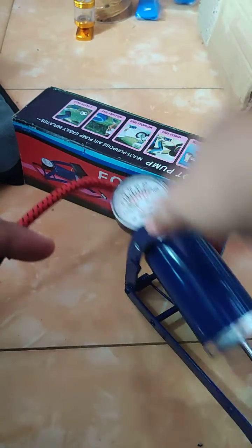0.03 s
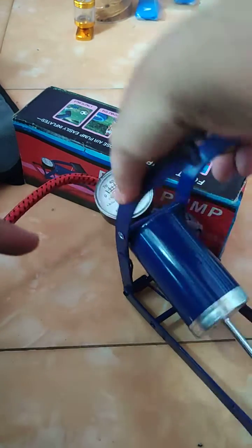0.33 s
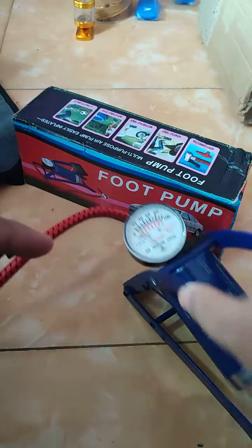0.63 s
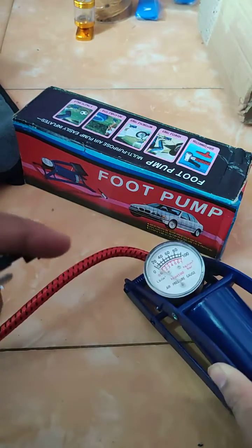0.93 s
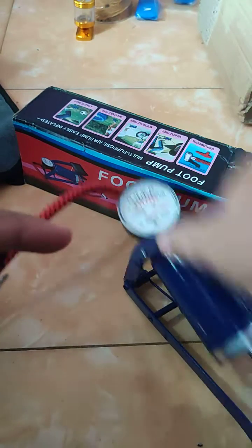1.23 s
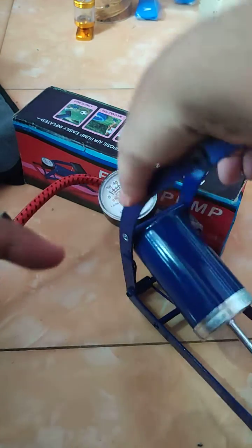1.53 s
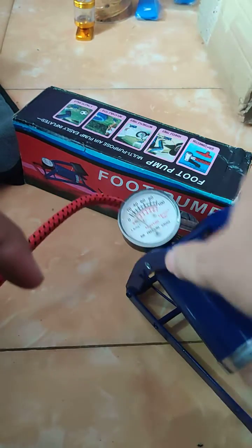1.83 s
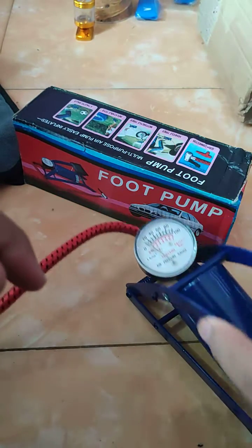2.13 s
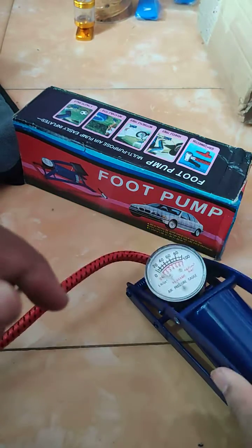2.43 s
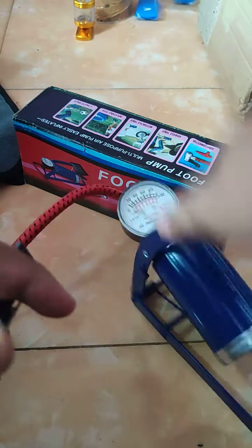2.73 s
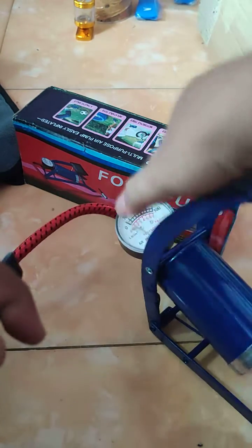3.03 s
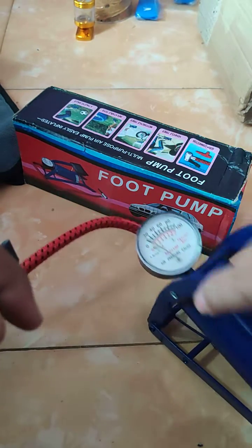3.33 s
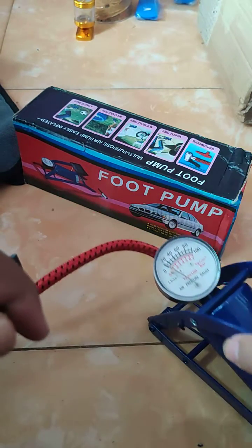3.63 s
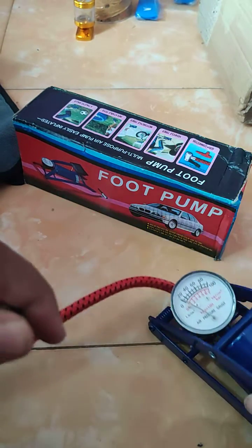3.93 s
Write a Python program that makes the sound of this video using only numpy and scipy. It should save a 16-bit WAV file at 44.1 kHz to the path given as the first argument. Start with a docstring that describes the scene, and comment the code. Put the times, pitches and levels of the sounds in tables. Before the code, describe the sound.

Close to the microphone, a foot pump pushes air from its hose in three hissing strokes, its pivot squeaking and its loose frame clicking in between. Low engine rumble from outside carries into the room throughout.

```python
"""A tiled room: a steel foot pump is worked by hand on the floor, close by.
Each down stroke hisses out of the hose; on the way back a dry pivot rubs and squeaks
and the loose frame clicks. Motor traffic drones through the walls: one engine idles,
another pulls away. A faint hush lies under it all."""
import sys
import numpy as np
from scipy import signal
from scipy.fft import rfft, irfft, next_fast_len
from scipy.io import wavfile
from scipy.ndimage import uniform_filter1d, map_coordinates

SR = 44100
rng = np.random.default_rng(int(sys.argv[2]) if len(sys.argv) > 2 else 0)


def unload_audio(sound):
    """Save the sound as a 16-bit wav file, at the path given as the first command line argument."""
    columns = np.transpose(np.atleast_2d(sound))
    # keep every value between -1 and 1, then stretch to whole-number steps
    steps = np.round(np.clip(columns, -1, 1) * 32767)
    wavfile.write(sys.argv[1], SR, steps.astype(np.int16))


N = 176400
PIVOT_PAN_DB, PIVOT_LEAD_MS = -4.5, 0.1


def amp(db):
    """Decibels to gain."""
    return 10 ** (np.asarray(db) / 20)


def unit(x):
    """Scale to rms 1."""
    return x / np.sqrt(np.mean(x ** 2) + 1e-20)


def clock():
    """Sample times in s."""
    return np.arange(N) / SR


def along(points, hz):
    """Interpolate (f/Hz, value) points on a log frequency axis."""
    f, values = np.transpose(points)
    return np.interp(np.log(hz + 1), np.log(f + 1), values)


def bell(hz, centre_hz, half_width_hz):
    """Gain of one resonance."""
    return 1 / (1 + ((hz - centre_hz) / half_width_hz) ** 2)


def gate(t, start_s, end_s, edge_s):
    """On from start to end, with linear edges."""
    return np.clip(np.minimum(t - start_s, end_s - t) / edge_s + .5, 0, 1)


def wobble(knots_per_s):
    """Smooth random curve, rms near 1."""
    return map_coordinates(rng.standard_normal(N // 20), [clock() * knots_per_s], mode="mirror")


def tone(hz):
    """Sine of rms 1 along a pitch curve."""
    return np.sqrt(2) * np.sin(2 * np.pi * (np.cumsum(hz) / SR + rng.random()))


def filtered(x, response):
    """Apply a complex frequency response."""
    n = x.shape[-1]
    size = next_fast_len(n + 8192)
    return irfft(rfft(x, size) * response(np.fft.rfftfreq(size, 1 / SR)), size)[..., :n]


def rush(gain, coherence):
    """Stereo noise of rms 1 shaped by gain(hz); coherence: f/Hz, left-right correlation."""
    def mid_side(hz):
        angle = np.arccos(np.clip(along(coherence, hz), -1, 1)) / 2
        return gain(hz) * np.array([np.cos(angle), np.sin(angle)])
    mid, side = filtered(rng.standard_normal((2, N)), mid_side)
    return unit(np.array([mid + side, mid - side]))


def placed(x, pan_db, lead_ms=0):
    """Stereo position; positive values make the left louder and earlier."""
    half = np.array([[.5], [-.5]])
    return filtered(x, lambda hz: amp(half * pan_db) * np.exp(2j * np.pi * hz * half * lead_ms / 1000))


def eddies(x, depth_db):
    """Turbulence lifts and drops each band on its own; output rms 1."""
    bands = signal.stft(x, nperseg=512)[2]
    field = uniform_filter1d(rng.standard_normal(bands.shape[1:]), size=6, axis=0)
    field = uniform_filter1d(field, size=12, axis=1)
    return unit(signal.istft(bands * amp(depth_db * unit(field)), nperseg=512)[1][:, :N])


def hose_hiss():
    """Air leaves the hose ever faster, with a jet tone and a sizzle, until the piston bottoms out."""
    # start/s, full flow/s, end/s, level/dB, swell/dB, jet/Hz, jet/dB, jet half width/Hz,
    # sizzle/dB, left lead/ms
    strokes = [(-.4, -.1, 0.038, -49.5, 10, 4580, -13, 300, -17, 0.1),
               (0.533, 0.878, 0.94, -37.5, 17, 4390, 1, 270, 2, 0.066),
               (1.858, 2.264, 2.415, -33, 20.5, 7450, -13.5, 278, -11.5, 0.086),
               (3.393, 3.864, 4.25, -37, 15.5, 7274, -7, 304, -3.5, 0.079)]
    air_spectrum = [(300, 8), (800, -10), (1250, -9.5), (2500, -0.5), (3500, -1), (4600, -0.5),
                    (5500, -0.5), (6500, 0.5), (7800, 0.5), (9000, 0.5), (10300, 1.5), (12800, -1),
                    (14200, 0.5)]  # f/Hz, level/dB
    air_coherence = [(1000, .1), (2500, 1), (4000, 0.19), (4900, 0.51), (5400, 1), (5900, 0.11),
                     (6700, 0.14), (9000, .1), (14000, 0.084)]  # f/Hz, left-right correlation
    nozzle_modes = [(11300, 190, -10), (12200, 420, -2.5), (13170, 230, -1), (13750, 210, 1)]  # f/Hz, half width/Hz, level/dB
    open_s, fall_20db_s, flutter_db = 0.059, 0.028, 1.3
    jet_swell, sizzle_swell = 1.38, 0.68  # multiples of the air's swell
    t, out = clock(), np.zeros((2, N))
    for start, full, end, db, swell_db, jet_hz, jet_db, width_hz, sizzle_db, lead_ms in strokes:
        slack_db = swell_db * np.clip((full - t) / (full - start), 0, 1) ** 1.15
        shut_db = 20 * np.maximum(t - end, 0) / fall_20db_s
        flow = amp(db + flutter_db * wobble(40) - shut_db) * np.clip((t - start) / open_s, 0, 1)
        air = eddies(rush(lambda hz: amp(along(air_spectrum, hz)), air_coherence), depth_db=3.2)

        def jet_gain(hz):
            core = bell(hz, jet_hz, 130)
            lower_partner = bell(hz, 0.793 * jet_hz, width_hz / 2.3)
            return bell(hz, jet_hz, width_hz) + amp(-10) * (core + lower_partner)
        jet = rush(jet_gain, [(4500, 0.3), (7000, 0.61)])
        sizzle = rush(lambda hz: sum(amp(d) * bell(hz, f, w) for f, w, d in nozzle_modes),
                      [(12000, .35)])
        stream = amp(-slack_db) * air + amp(jet_db - jet_swell * slack_db) * jet
        stream += amp(sizzle_db - sizzle_swell * slack_db) * placed(sizzle, pan_db=-1)
        out += placed(flow * stream, 0, lead_ms)
    return out


def pivot_squeaks():
    """Friction pumps up one mode of the pivot: scratchy when weak, pure when it locks in."""
    # start/s, peak/s, end/s, level/dB, growth/dB, f/Hz, roughness/0-1
    squeaks = [(0, .005, .03, -42, 2, 2530, .7), (.065, .1, .128, -46, 5, 2480, .7),
               (.133, .14, .147, -35, 6, 2480, .2), (.151, .192, .205, -30.5, 9, 2480, .1),
               (1.197, 1.218, 1.232, -41, 6, 2600, .6), (1.29, 1.34, 1.372, -45, 6, 2470, .6),
               (1.372, 1.44, 1.443, -15.5, 27, 2500, .06), (1.443, 1.444, 1.447, -28, 2, 2900, .4),
               (1.451, 1.455, 1.461, -35, 2, 2560, .7), (2.62, 2.622, 2.629, -37, 3, 2480, .6),
               (2.66, 2.699, 2.713, -40.5, 10, 2550, .85), (2.755, 2.79, 2.815, -38.5, 13, 2490, .75),
               (2.824, 2.85, 2.862, -18.5, 20, 2506, .08)]
    harmonics = [(1, -3), (2, -55), (3, -47)]  # multiple, level/dB
    rasp_spectrum = [(2000, -2), (3300, -4), (4500, 3), (5600, -3), (6700, -15.5), (7500, -0.5),
                     (8500, -15), (11000, -14), (12800, -1), (14300, -4)]  # friction noise: f/Hz, level/dB
    fade_db, hz_per_db, waver_hz, rasp_db = 4.5, 1.5, 12.9, -39.5
    t, out, grip = clock(), np.zeros(N), np.zeros(N)
    for start, peak, end, db, growth_db, hz, rough in squeaks:
        swing_db = np.interp(t, [start, peak, end], [-growth_db, 0, -fade_db])
        level = amp(db + swing_db + wobble(120))
        sliding = gate(t, start, end, edge_s=0.002)
        bend_hz = 70 * np.exp(np.minimum(t - end, 0) / .004)  # flicks up as the joint lets go
        pitch_hz = hz + hz_per_db * swing_db + bend_hz + waver_hz * wobble(90)
        note = sum(amp(d) * tone(k * pitch_hz) for k, d in harmonics)
        scrape = sum(wobble(380) * tone(pitch_hz) for _ in range(2)) / np.sqrt(2)
        out += level * sliding * (np.sqrt(1 - rough ** 2) * note + rough * scrape)
        grip += sliding * level ** 0.41  # the rasp swells less than the note
    rasp_level = amp(rasp_db + 3.8 * wobble(250)) * grip
    rasp = rasp_level * rush(lambda hz: amp(along(rasp_spectrum, hz)), [(2500, 0.36)])
    return placed(out + rasp, PIVOT_PAN_DB, PIVOT_LEAD_MS)


def frame_clicks():
    """Loose joints snap over: a brief clatter in the steel frame's resonances and a faint ring."""
    clicks = [(0.2142, -37.5, -2), (0.3838, -20.5, 7), (0.389, -20.5, 5.5), (0.43, -40.5, -4),
              (0.6079, -33.5, 0), (0.936, -38, -3.5), (1.1945, -38, -1), (1.3543, -48, 5), (1.464, -35, 0),
              (1.5506, -25, 6.5), (1.571, -23, 7.5), (1.5738, -34.5, -0.5), (1.6178, -41, -3),
              (1.884, -30, 1), (2.405, -40.5, -7), (2.6186, -38, -8.5), (2.863, -29.5, -4),
              (2.871, -41, -1), (2.9117, -48, 6), (2.9372, -41, 7), (3.0938, -18, 5), (3.0961, -25, 13),
              (3.1, -18, 6.5), (3.3562, -48, -9)]  # t/s, level/dB, tilt/(dB/octave)
    spectrum = [(300, 0), (800, -10), (1350, 2.5), (1900, -0.5), (2700, 7), (3300, -4), (3950, 5.5),
                (4700, -5), (5400, 1.5), (6000, -6), (7000, -4), (8300, -8.5), (10500, -11), (14000, -1.5)]  # f/Hz, level/dB
    modes = [(1284, 0.5, 0.021), (2550, -8, 0.022), (3390, -4, 0.029), (3785, -1.5, 0.036),
             (5660, -12, 0.044), (6460, 6.5, 0.015), (7200, 6.5, 0.017), (8000, -21, 0.015),
             (10070, -4.5, .02)]  # f/Hz, level/dB, T60/s
    hold_s, snap_t60_s, tail_db, tail_t60_s, ring_db = 0.0029, 0.014, -13.5, 0.19, -14
    out, t = np.zeros((2, N + SR)), np.arange(SR // 6) / SR
    decay = amp(-60 * np.maximum(t - hold_s, 0) / snap_t60_s) + amp(tail_db - 60 * t / tail_t60_s)
    for start_s, db, tilt_db in clicks:
        def colour(hz):
            return amp(along(spectrum, hz) + tilt_db * np.log2(np.maximum(hz, 1000)))
        clatter = unit(filtered(rng.standard_normal((2, len(t))), colour))
        ring = sum(amp(mode_db + rng.normal(0, 1) - 60 * t / t60_s)
                   * np.sin(2 * np.pi * (hz * t + rng.random((2, 1)))) for hz, mode_db, t60_s in modes)
        i = round(start_s * SR)
        out[:, i:i + len(t)] += amp(db) * (clatter * decay + amp(ring_db) * ring)
    return placed(out[:, :N], pan_db=-2.5)


def pivot_rubbing():
    """Dry, uneven friction while the pump springs back."""
    rubs = [(0, 0.226, -62), (.42, 0.566, -60), (1.17, 1.506, -52), (2.584, 2.756, -51),
            (2.777, 2.883, -45.5)]  # start/s, end/s, level/dB
    spectrum = [(1000, 8), (2150, 1.5), (2520, 3), (2950, -5), (3600, -5), (4500, 2.5), (5300, -11),
                (6800, -8), (7500, -3), (8400, -26), (13000, -21)]  # f/Hz, level/dB
    level = sum(amp(db) * gate(clock(), start, end, edge_s=0.018) for start, end, db in rubs)
    grain = amp(2.5 * wobble(130))
    friction = rush(lambda hz: amp(along(spectrum, hz)), [(2500, 0.25)])
    return placed(level * grain * friction, PIVOT_PAN_DB, PIVOT_LEAD_MS)


def room_tail(x):
    """Reverberation off the tiles, different at each ear."""
    decay_times = [(300, 0.22), (2500, 0.37), (8000, 0.22), (14000, 0.24)]  # f/Hz, T60/s
    hz, t, bands = signal.stft(rng.standard_normal((2, SR // 2)), SR, nperseg=256)
    tail = signal.istft(bands * amp(-60 * t / along(decay_times, hz)[:, None]), SR, nperseg=256)[1]
    return signal.fftconvolve(x.mean(0)[None], tail / np.linalg.norm(tail[0]), axes=1)[:, :N]


def pulling_engine():
    """An engine pulls away; two orders of its rising firing rate get through the walls."""
    firing = [(1.9, 61.9, -41), (2.051, 65.37, -30.5), (2.551, 71.23, -29), (2.88, 77.04, -38.5),
              (3.15, 81.2, -25.5), (3.38, 83.3, -21), (3.55, 85, -22.5), (3.75, 89.3, -33), (4, 91.7, -36)]  # t/s, f/Hz, level/dB
    second_order = [(0, -77), (1.8, -38), (2.15, -31), (2.6, -34), (3, -50), (4, -60)]  # t/s, level/dB
    fade_in_db_per_s = 36
    t = clock()
    times_s, hz, db = np.transpose(firing)
    firing_hz = np.interp(t, times_s, hz)
    first_db = np.interp(t, times_s, db) - fade_in_db_per_s * np.maximum(times_s[0] - t, 0)
    first = amp(first_db) * tone(firing_hz)
    second_db = np.interp(t, *np.transpose(second_order)) + 1.8 * wobble(8.3)
    return first + amp(second_db) * tone(2 * firing_hz)


def idling_engine():
    """Low orders of a slightly uneven idle, each drifting in level."""
    orders = [(2, -50.5, -38), (4, -31.5, -43), (5, -44, -39), (6, -59, -46.5), (7, -45, -41),
              (9, -44.5, -47.5), (10, -47.5, -49.5), (11, -46.5, -51.5), (12, -53.5, -50.5),
              (13, -73, -43.5), (15, -59, -51), (16, -62.5, -53), (18, -75.5, -58), (20, -85.5, -59)]  # multiple, start level/dB, end level/dB
    idle_hz = 29.52 * (1 + 0.01208 * wobble(3))
    return sum(amp(np.linspace(start_db, end_db, N) + 2.8 * wobble(7)) * tone(k * idle_hz)
               for k, start_db, end_db in orders)


def traffic_drone():
    """Low traffic tones swell, glide and fade."""
    swells = [(0.55, 0.55, 123.7, -2, -32), (0.636, 0.35, 283.5, 5, -37), (1.053, 0.18, 156, 30.5, -32.5),
              (1.596, 0.063, 120, 0.5, -24.5), (1.747, 0.37, 156, 28, -32.5),
              (1.751, 0.25, 318.2, -45, -39), (2.197, 0.23, 119.9, -0.5, -38.5),
              (2.737, 0.72, 285.7, 0, -43.5), (3.3, 0.17, 321, -1, -48), (3.25, 0.31, 346, 2.5, -43),
              (3.601, 0.52, 195, 10, -45), (3.752, 0.29, 469.5, 23.5, -52.5)]  # centre/s, half length/s, f/Hz, glide/(Hz/s), level/dB
    t, out = clock(), np.zeros(N)
    for centre_s, half_s, hz, hz_per_s, db in swells:
        level = amp(db + 0.68 * wobble(8.96)) * np.exp(-((t - centre_s) / half_s) ** 2)
        out += level * tone(hz + hz_per_s * (t - centre_s) + 1.54 * wobble(12))
    return out


def traffic_rumble():
    """Traffic noise through the walls: a swelling boom over a steady rumble."""
    boom_levels = [(0, -38), (.5, -39.5), (.9, -32), (1.1, -37), (1.25, -41), (1.6, -28), (1.9, -32.5),
                   (2.3, -36), (2.8, -38), (4, -50)]  # t/s, level/dB
    spectrum = [(18, -26), (30, -6), (54, 0.5), (73, -4), (91, -3), (135, -3), (183, -4), (215, -6),
                (236, -10.5), (285, -5.5), (400, -12.5), (540, -25.5), (900, -32), (1500, -61)]  # f/Hz, level/dB
    coherence = [(60, 1), (140, 0.97), (280, 0.93), (500, 0.12), (900, 0.18)]
    boom = rush(lambda hz: bell(hz, centre_hz=132.6, half_width_hz=41) ** 2, coherence)
    rumble = rush(lambda hz: amp(along(spectrum, hz)), coherence)
    return amp(np.interp(clock(), *np.transpose(boom_levels))) * boom + amp(-30) * rumble


def room_hush():
    """Faint, steady, diffuse noise."""
    spectrum = [(290, 3), (500, -2.5), (909, -6), (1060, -5.5), (1650, -6.5), (2610, -8), (9930, -21.5),
                (14000, -16.5), (15000, -45)]  # f/Hz, level/dB
    return amp(-44.5) * rush(lambda hz: amp(along(spectrum, hz)), [(500, 0.057), (2000, 0.05)])


def scene():
    """The pump over traffic and hush; only frame and pivot reverberate."""
    frame = frame_clicks()
    pivot = pivot_squeaks() + pivot_rubbing()
    hush = room_hush()
    pump = hose_hiss() + frame + pivot
    reverb = room_tail(amp(-10) * frame + amp(-19) * pivot)
    traffic = pulling_engine() + idling_engine() + traffic_drone() + traffic_rumble()
    return pump + reverb + traffic + hush


def record(dry):
    """Two band-limited microphones, each with its own colour."""
    mic_gains = [(99, -0.5, -1), (307, -6, -2.5), (675, 1.5, -1.5), (1160, 4.5, 2), (4000, 1, 1),
                 (5440, 2.5, 2), (7700, 4.5, 8.5), (8670, 8, -2), (10300, -2, 1.5), (11700, 1.5, -1),
                 (13500, 0.5, -3.5)]  # f/Hz, left/dB, right/dB
    top_hz = 14330
    left, right = np.array(mic_gains)[:, [0, 1]], np.array(mic_gains)[:, [0, 2]]
    return filtered(dry, lambda hz: amp([along(left, hz), along(right, hz)]) * (hz < top_hz))


dry = scene()
out = record(dry)
unload_audio(out)
```